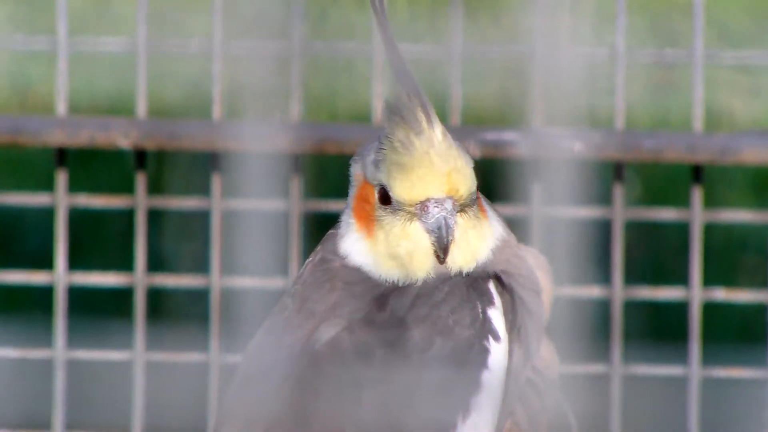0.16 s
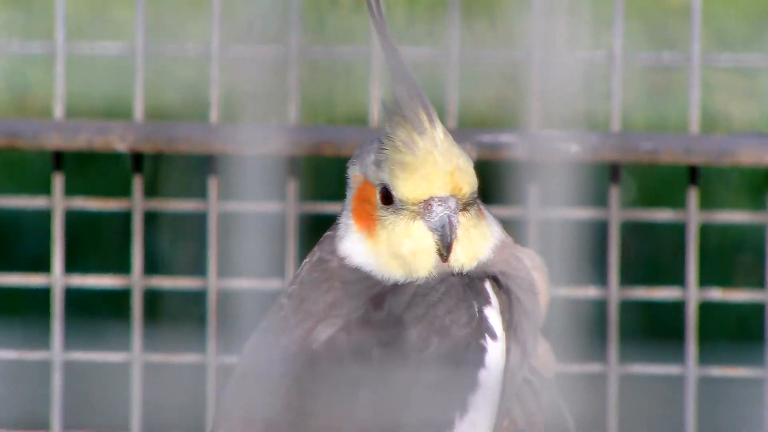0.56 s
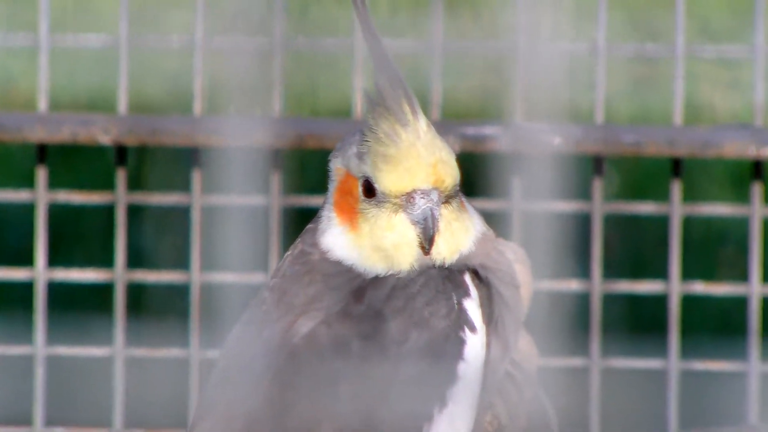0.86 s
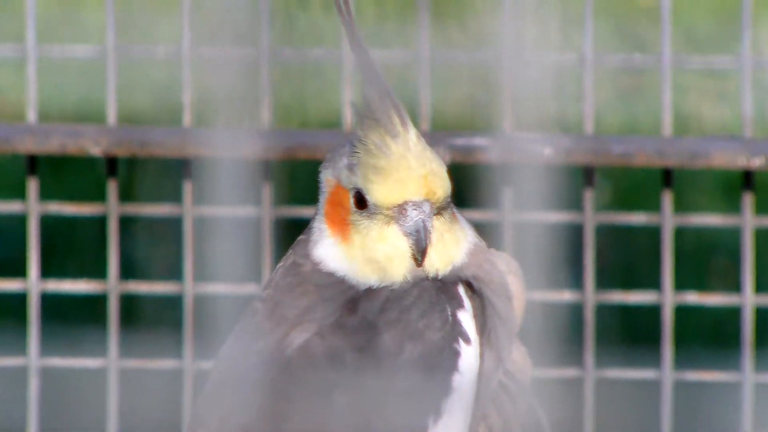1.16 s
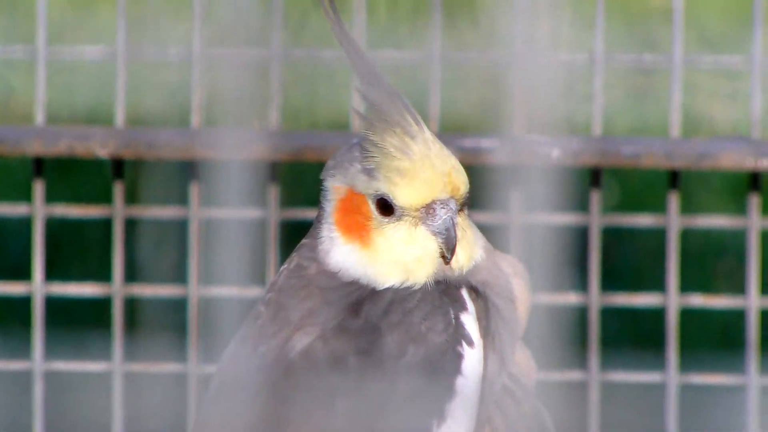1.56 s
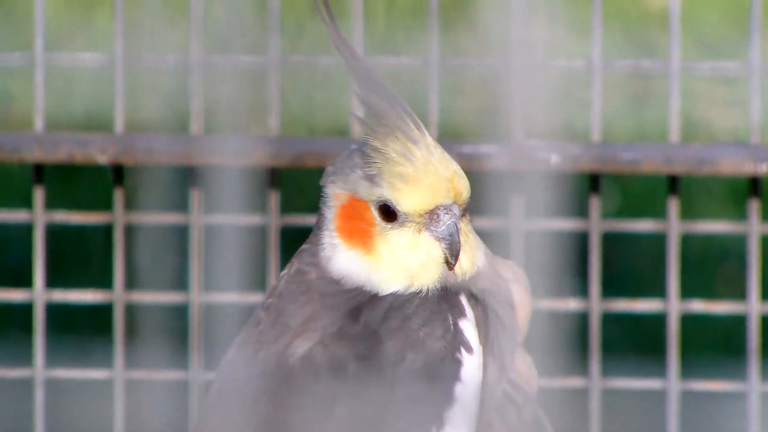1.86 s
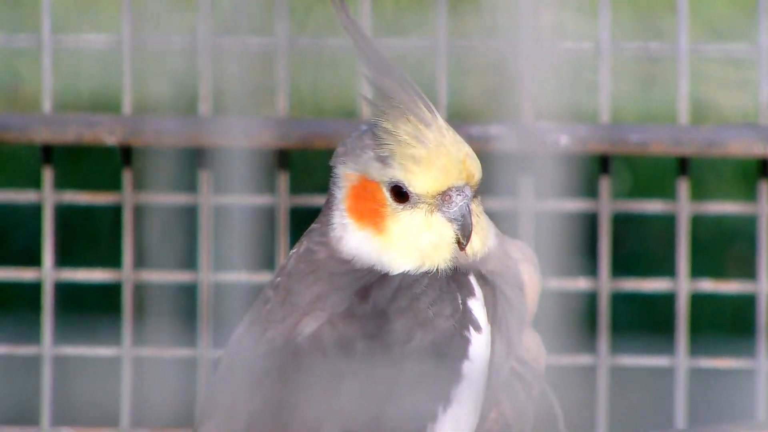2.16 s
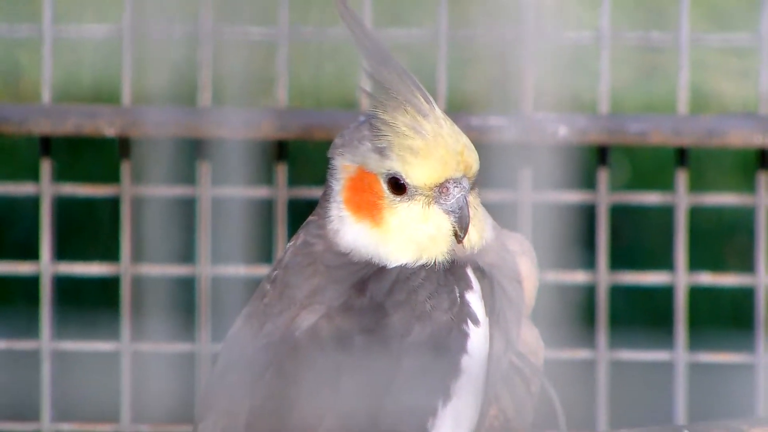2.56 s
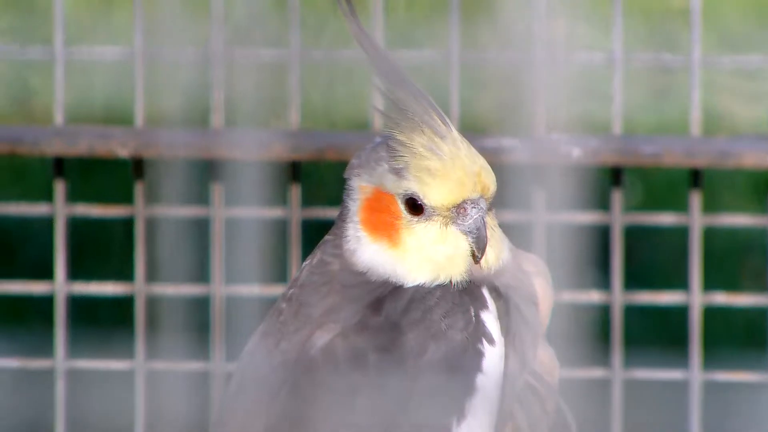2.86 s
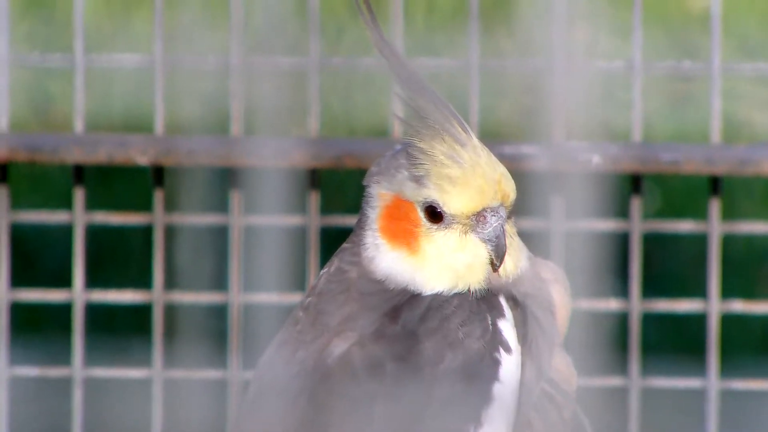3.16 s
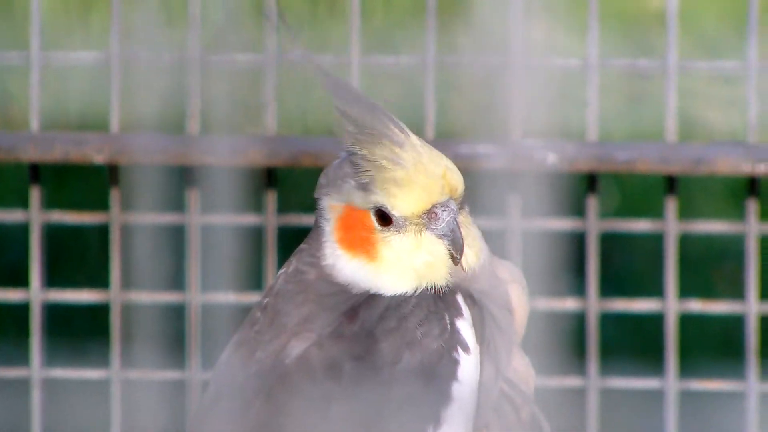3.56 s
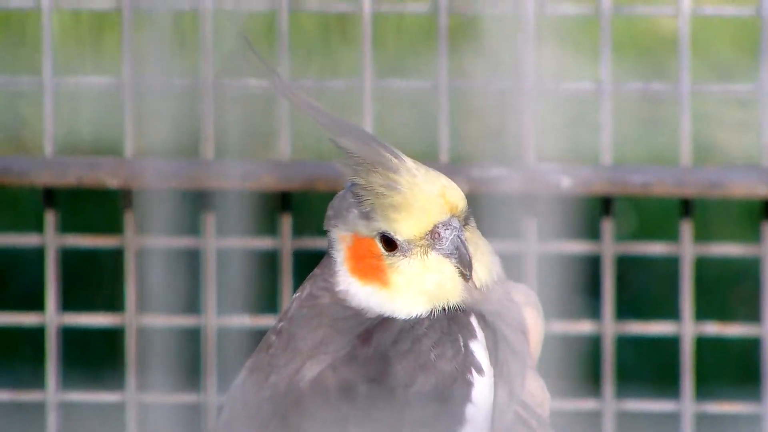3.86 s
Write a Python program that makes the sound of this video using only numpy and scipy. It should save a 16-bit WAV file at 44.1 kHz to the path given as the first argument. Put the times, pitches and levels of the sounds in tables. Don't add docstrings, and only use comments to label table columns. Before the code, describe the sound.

A cockatiel close to the microphone is already whistling loudly at 0 s, briefly climbing, then dropping in steps and stopping by 0.16 s, rich in overtones. Quiet outdoor hush, faint hum and a soft air push remain. Thin distant birds, feather rustles and ringing wire ticks follow. At 2.1-2.7 s a farther cockatiel answers with two rough trilled rising notes off walls; afterwards small sounds grow busier until 4 s.

```python
import sys
import numpy as np
from scipy import signal
from scipy.fft import rfft, irfft
from scipy.io import wavfile
from scipy.ndimage import uniform_filter1d, map_coordinates

SR = 44100
rng = np.random.default_rng(int(sys.argv[2]) if len(sys.argv) > 2 else 0)


def transcribe(signal):
    frames = np.atleast_2d(signal).T
    limited = np.clip(frames, -1, 1)
    pcm = np.round(limited * 32767).astype(np.int16)
    wavfile.write(sys.argv[1], SR, pcm)


def to_linear_factor(level_db):
    exponent = np.asarray(level_db, float) / 20
    return 10 ** exponent


N = 176400

# (time [s], pitch [Hz], level [dB], overtone boost [dB
NEAR_WHISTLE = [
    (0, 3640, -20, 7, 0.0046),
    (.006, 3665, -14.5, 1, 0.0035),
    (.014, 3750, -12.5, 1, .004),
    (.026, 3905, -18, 1.5, .004),
    (.044, 3834, -13.5, 3.5, .004),
    (.058, 3710, -16.5, 1.5, 0.0045),
    (.07, 3475, -14, 5.5, .004),
    (.082, 3403, -13.5, 6.5, .004),
    (.09, 3566, -15.5, 7.5, 0.0044),
                (0.093, 3040, -18, 5.5, 0.0035),
    (0.099, 2905, -19.5, 7, 0.0037),
    (.112, 2877, -16.5, 7, 0.0055),
    (.124, 2820, -18.5, 7, .004),
    (0.143, 2781, -10, 3.1, .004),
    (0.149, 2455, -13.5, 7.9, .004),
    (0.157, 2070, -17.5, 9.7, .004),
    (0.163, 1650, -27, 2.2, 0.0029),
]
# (time [s], pitch [Hz], level [dB], overtone boost [dB per octave], trill depth [share])
FAR_FIRST = [
    (2.135, 1443, -64, 1, 0.022),
    (2.146, 1444, -47, -4, 0.016),
    (2.185, 1517, -46.5, 2, 0.047),
    (2.225, 1658, -39.5, -2.5, 0.04),
    (2.27, 1724, -40.5, -1, 0.06),
    (2.325, 1666, -40.5, -3, 0.05),
    (2.385, 1737, -46, -4, 0.03),
    (2.394, 1636, -48.5, -11, 0.044),
]
FAR_SECOND = [
    (2.398, 1556, -44.5, 2, 0.033),
    (2.419, 1665, -43.5, 9, 0.022),
    (2.436, 1863, -36, 0, 0.014),
    (2.49, 1946, -32, -3.5, 0.012),
    (2.54, 2410, -36.5, -4, 0.043),
    (2.635, 2302, -34, -6.5, 0.032),
    (2.675, 2424, -30.5, -7, 0.034),
    (2.728, 2374, -33, -1, 0.034),
    (2.734, 1851, -39.5, -5, 0.02),
]
# (time [s], width [s], level [dB])
BREATH_SURGES = [(.0175, 0.0011, -10), (.051, 0.0028, -3), (0.059, 0.0022, 7), (.0645, 0.0029, 1),
                 (0.069, 0.0034, 4), (.0745, .002, -8), (0.12, .003, 2), (0.146, .0015, -3.5),
                 (2.145, 0.0046, 5), (2.448, 0.0038, 4.5), (2.46, .005, -3.5), (2.47, .006, 3.5),
                 (2.478, .002, -18), (2.488, 0.003, 5.5), (2.496, .003, -4), (2.71, 0.0023, 1),
                 (2.714, 0.0016, -22), (2.724, 0.0034, 8.5)]
NEAR_OVERTONES = [-3.5, -15.5, -22, -29.5, -35.5, -42, -43, -48.5]
FAR_FIRST_OVERTONES = [8.5, 2, 2.5, 4.5, 0, -1.5, -6, -7]
FAR_SECOND_OVERTONES = [10.5, 6.5, -1, -1.5, -5.5, -11, -17.5]
# (frequency [Hz], level [dB])
NEAR_THROAT = [(1400, -29), (2500, -1), (4000, 4), (7000, -4.5), (11000, -6.5), (16000, -6)]
FAR_THROAT = [(1400, -15), (2900, -0.5), (3800, 7), (4300, -4.5), (5000, 2.5), (7000, -2), (10500, -7.5),
              (16000, -16.5)]
BREATH_COLOUR = [(30, 2.5), (300, -1.5), (2000, -1), (6000, -1), (10000, 1), (16000, -3)]
# (frequency [Hz], t60 [s])
NEAR_WALLS = [(1500, 0.2), (4000, .14), (8000, 0.16), (16000, .07)]
FAR_WALLS = [(1500, 0.22), (2500, 0.15), (3800, 0.13), (4800, 0.17), (7000, .15), (16000, 0.072)]
YARD = [(1500, .5), (4000, 0.98), (6000, 0.37), (16000, 0.27)]
HOUSE_FRONT = [(2000, 0.57), (4000, 0.49), (6000, 0.1)]
# (frequency [Hz], level [dB per Hz])
HUSH_COLOUR = [(12, -1), (25, -5.5), (90, -19), (200, -19.5), (295, -20.5), (450, -11), (820, -10),
               (900, -21.5),
               (1000, -9), (1300, -11), (2000, -17.5), (4000, -21), (8000, -21.5), (10500, -26.5),
             (13000, -31), (15500, -24)]
# (time [s], level [dB])
HUSH_LEVEL = [
    (0, -57),
    (1, -58),
    (2, -58),
    (2.7, -58),
    (3.2, -59),
    (4, -59),
]
# (time [s], length [s], level [dB])
AIR_PUSHES = [
    (.12, .05, -55.5),
    (3.53, 0.045, -66.5),
]
# (frequency [Hz], level [dB])
PUSH_COLOUR = [(15, -2), (30, -6), (150, -8.5), (400, -19), (800, -60)]
# (time [s], length [s], level [dB])
RUSTLES = [
    (.443, 0.073, -66.5),
    (.445, .38, -68.5),
    (.82, 0.39, -66),
    (1.58, 0.13, -69),
    (2.942, 0.022, -63.5),
    (3.45, 0.044, -58.5),
    (3.02, .06, -64),
    (3.5, .05, -68),
    (3.61, 0.068, -67),
    (3.933, 0.058, -61),
]
# (frequency [Hz], level [dB])
FEATHER_COLOUR = [(3000, -44), (5000, 0), (6500, 4.5), (9000, 8.5), (11000, -15), (13000, -58.5)]
# (time [s], length [s], start pitch [Hz], end pitch [Hz], level [dB])
GARDEN_CALLS = [(.32, .04, 4750, 4750, -67), (.83, .2, 7550, 7480, -70), (.985, .07, 5750, 5150, -65),
                (1.15, .14, 6950, 6500, -67), (1.66, .06, 4000, 3300, -64), (1.67, .19, 4745, 4735, -70),
                (1.88, .2, 4735, 4725, -73), (1.8, .45, 5660, 5630, -71), (2.7, .3, 5610, 5580, -73),
                (3.0, .28, 5580, 5550, -76), (3.0, .075, 7500, 6200, -62), (3.03, .28, 3260, 3190, -75),
                (3.12, .07, 7400, 6800, -74), (3.2, .04, 5200, 4800, -70), (3.24, .085, 6700, 5500, -65),
                (3.27, .15, 7620, 7550, -70), (3.28, .18, 3180, 3140, -70), (3.43, .04, 5700, 5200, -66),
                (3.47, .06, 3130, 3110, -74), (3.53, .05, 3120, 3100, -67), (3.62, .1, 3110, 3090, -74),
                (3.72, .05, 3110, 3080, -67), (3.66, .09, 3480, 3470, -74), (3.82, .05, 3070, 3060, -65),
                (3.91, .08, 3050, 3030, -64)]
# (time [s], peak level [dB])
WIRE_TICKS = [(.569, -56), (.7636, -52), (.897, -56), (1.036, -55.5), (1.275, -61), (1.402, -55.5),
              (1.802, -57), (2.07, -57), (2.432, -51), (3.033, -51), (3.054, -54), (3.338, -55),
              (3.672, -54.5), (3.866, -49)]
# (frequency [Hz], level [dB], t60 [s])
WIRE_MODES = [(2100, -12, .008), (2870, 0, .045), (2900, -5, .007), (4250, -9, .008), (5100, -11, .007),
              (7300, -12, .007), (8400, -11, .007), (9300, -13, .007)]

TRILL_HZ, FAST_TRILL_HZ, TRILL_DRIFT = 75.5, 130.1, .03
FLUTTER_DB, FAST_FLUTTER_DB = 10, -1.5
DWELL, SHAKE = 0.24, .0045
WANDER_DB, WANDER_RATE, BLUR = 3, 150, 0.098
EDGE_S, NEAR_BREATH_DB, FAR_BREATH_DB = 0.00075, -25, -24.5
NEAR_WALLS_DB, NEAR_YARD_DB, FAR_WALLS_DB, FAR_YARD_DB = -9.5, -35.5, -9, -28.5
SLAP_S, SLAP_DB = .0105, -4
HOUSE_S, HOUSE_DB = .28, -54.5
PATCHY_DB = -0.5
HUM_HZ, HUM_DB = 200, -77.5
GARDEN_ECHO_DB = -4
HARDER = 2.5
TOP_HZ = 15790


def unit(x):
    return x / np.sqrt(np.mean(x ** 2) + 1e-20)


def along(points, hz):
    f, v = np.transpose(points)
    return np.interp(np.log(hz + 1), np.log(f + 1), v)


def wobble(rate, size):
    knots = rng.standard_normal(int(size * rate / SR) + 4)
    return map_coordinates(knots, [np.arange(size) * rate / SR])


def noise(spectrum):
    gain = to_linear_factor(along(spectrum, np.fft.rfftfreq(N, 1 / SR)))
    return unit(irfft(rfft(rng.standard_normal(N)) * gain, N))


def add(track, s, x):
    part = track[max(round(s * SR), 0):][:len(x)]
    part += x[:len(part)]


def echo(x, decay):
    hz, t, z = signal.stft(rng.standard_normal(SR), SR, nperseg=128)
    fade = to_linear_factor(-60 * t / along(decay, hz)[:, None])
    tail = signal.istft(z * fade, SR, nperseg=128)[1]
    return signal.fftconvolve(x, tail / np.linalg.norm(tail))[:N]


def voice(notes, throat, breath_db):
    out, air = np.zeros(N), noise(BREATH_COLOUR)
    for rows, orders_db, trill_hz, flutter_db in notes:
        s, *cols = np.transpose(rows)
        t = s[0] + np.arange(round((s[-1] - s[0]) * SR)) / SR
        hz, db, boost_db, depth = [np.interp(t, s, c) for c in cols]
        for at, width, surge_db in BREATH_SURGES:
            db = db + surge_db * np.exp(-((t - at) / width) ** 2)

        turn = 2 * np.pi * np.cumsum(trill_hz * (1 + TRILL_DRIFT * wobble(40, size=len(t)))) / SR
        trill = np.sin(turn) + DWELL * np.cos(2 * turn)
        hz = hz * (1 + depth * trill + SHAKE * wobble(300, size=len(t)))
        phase = 2 * np.pi * np.cumsum(hz) / SR

        k = np.arange(1, len(orders_db) + 1)[:, None]
        gains_db = np.array(orders_db)[:, None] + boost_db * np.log2(k) + along(throat, k * hz)
        gains = to_linear_factor(gains_db) * (k * hz < SR / 2)
        swell = np.array([wobble(WANDER_RATE, size=len(t)) for _ in k])
        slip = np.array([wobble(800, size=len(t)) for _ in k])
        parts = to_linear_factor(WANDER_DB * np.log2(k) * swell / 2) * np.sin(k * phase + BLUR * (k - 1) * slip)
        parts[0] *= to_linear_factor(flutter_db * trill * depth / .04 - 2)
        tone = np.sum(gains * parts, 0) / np.sqrt(np.sum(gains ** 2, 0) / 2)

        edge = np.clip(np.minimum(t - t[0], t[-1] - t) / EDGE_S, 0, 1)
        breath = to_linear_factor(breath_db) * air[round(t[0] * SR):][:len(t)]
        add(out, t[0], to_linear_factor(db) * edge * (tone + breath))
    return out


def cockatiels():
    near = voice([(NEAR_WHISTLE, NEAR_OVERTONES, TRILL_HZ, FLUTTER_DB)], NEAR_THROAT, NEAR_BREATH_DB)
    answer = [(FAR_FIRST, FAR_FIRST_OVERTONES, TRILL_HZ, FLUTTER_DB),
              (FAR_SECOND, FAR_SECOND_OVERTONES, FAST_TRILL_HZ, FAST_FLUTTER_DB)]
    far = voice(answer, FAR_THROAT, FAR_BREATH_DB)
    far = far + to_linear_factor(SLAP_DB) * np.roll(far, round(SLAP_S * SR))
    walls = to_linear_factor(NEAR_WALLS_DB) * echo(near, NEAR_WALLS) + to_linear_factor(FAR_WALLS_DB) * echo(far, FAR_WALLS)
    delayed = np.pad(near + far, (round(HOUSE_S * SR), 0))[:N]
    house = to_linear_factor(HOUSE_DB) * echo(delayed, HOUSE_FRONT)
    yard = echo(to_linear_factor(NEAR_YARD_DB) * near + to_linear_factor(FAR_YARD_DB) * far, YARD)
    return near + to_linear_factor(-2.5) * far + walls + house + yard


def hush():
    z = signal.stft(noise(HUSH_COLOUR), nperseg=512)[2]
    patches = uniform_filter1d(uniform_filter1d(rng.standard_normal(z.shape), 8, 0), 20, 1)
    patchy = signal.istft(z * to_linear_factor(PATCHY_DB * unit(patches)), nperseg=512)[1][:N]
    s, db = np.transpose(HUSH_LEVEL)
    return to_linear_factor(np.interp(np.arange(N) / SR, s, db)) * patchy


def hum():
    phase = 2 * np.pi * np.cumsum(HUM_HZ + 6 * wobble(12, size=N)) / SR
    return to_linear_factor(HUM_DB + wobble(8.6, size=N)) * np.sin(phase)


def puffs(rows, colour):
    swell = np.zeros(N)
    for s, length, db in rows:
        u = np.linspace(0, 1, round(length * SR))
        add(swell, s, to_linear_factor(db) * np.sin(np.pi * u ** 0.36))
    return swell * noise(colour)


def garden():
    out = np.zeros(N)
    for s, length, start_hz, end_hz, db in GARDEN_CALLS:
        u = np.linspace(0, 1, round(length * SR))
        slide_hz = end_hz - start_hz
        unsteady_hz = (22 + .05 * abs(slide_hz)) * wobble(147, size=len(u))
        phase = 2 * np.pi * np.cumsum(start_hz + slide_hz * u + unsteady_hz) / SR
        swell = np.sin(np.pi * u ** .6) ** .5
        add(out, s, to_linear_factor(db + 2.5 * wobble(50, size=len(u))) * swell * np.sin(phase))
    return out + to_linear_factor(GARDEN_ECHO_DB) * echo(out, YARD)


def wire():
    out, t = np.zeros(N), np.arange(SR // 20) / SR
    for s, db in WIRE_TICKS:
        ring = np.zeros(len(t))
        for hz, level, t60 in WIRE_MODES:
            mode_db = level + (level < 0) * HARDER * (db + 54.5)
            ring += to_linear_factor(mode_db - 60 * t / t60) * np.sin(2 * np.pi * hz * t)
        add(out, s - .001, to_linear_factor(db) * (1 - np.exp(-t / 0.0004)) * ring)
    return out


def scene():
    mix = cockatiels() + hush() + hum() + puffs(AIR_PUSHES, PUSH_COLOUR)
    mix = mix + garden() + puffs(RUSTLES, FEATHER_COLOUR) + wire()
    return mix[None]


def roll_off(x):
    return signal.sosfilt(signal.butter(12, 16500, fs=SR, output="sos"), x)


def record(dry):
    passed = np.fft.rfftfreq(N, 1 / SR) < TOP_HZ
    mix = irfft(rfft(dry) * passed, N)
    return roll_off(mix)


dry = scene()
out = record(dry)
transcribe(out)
```